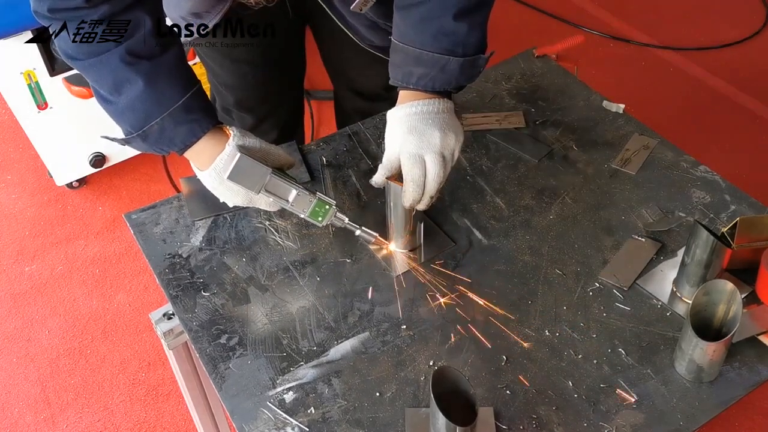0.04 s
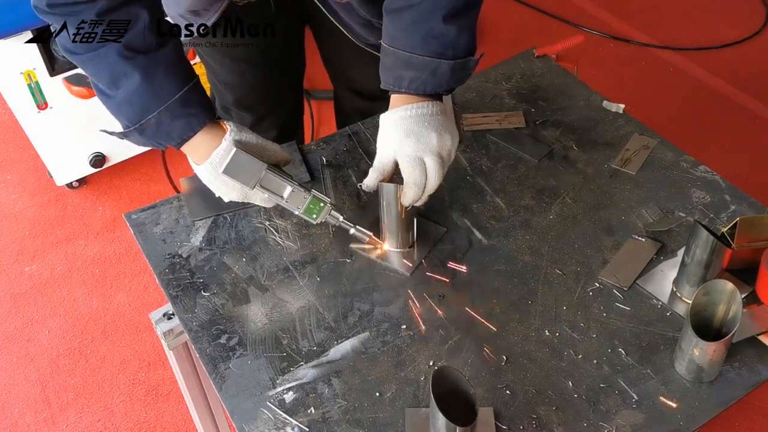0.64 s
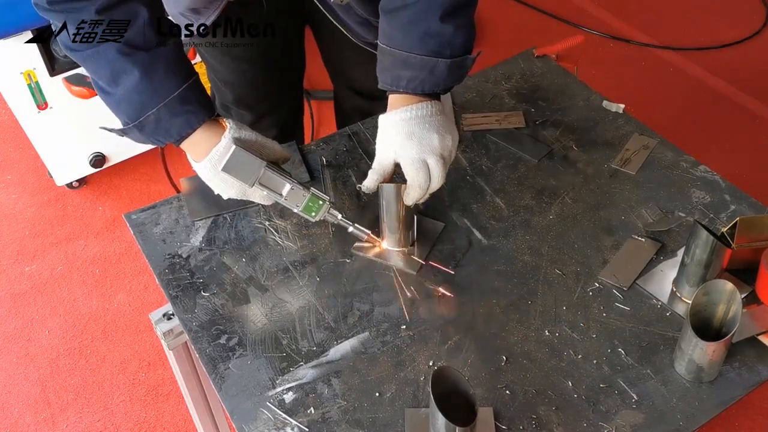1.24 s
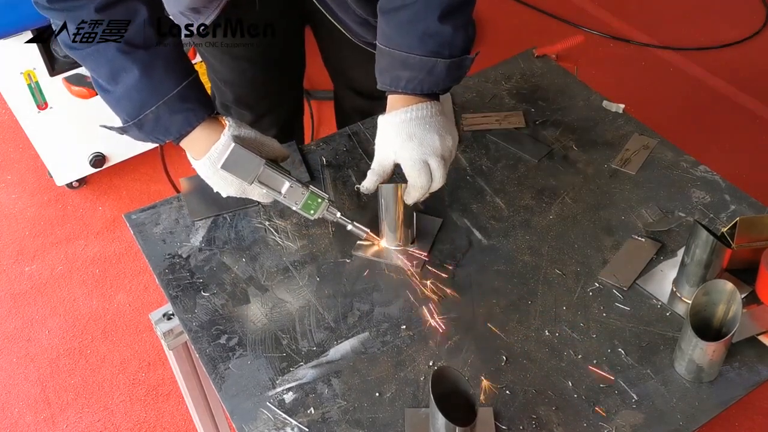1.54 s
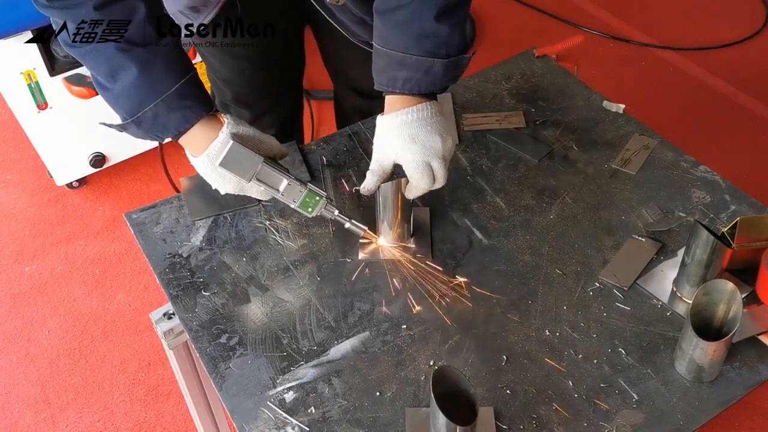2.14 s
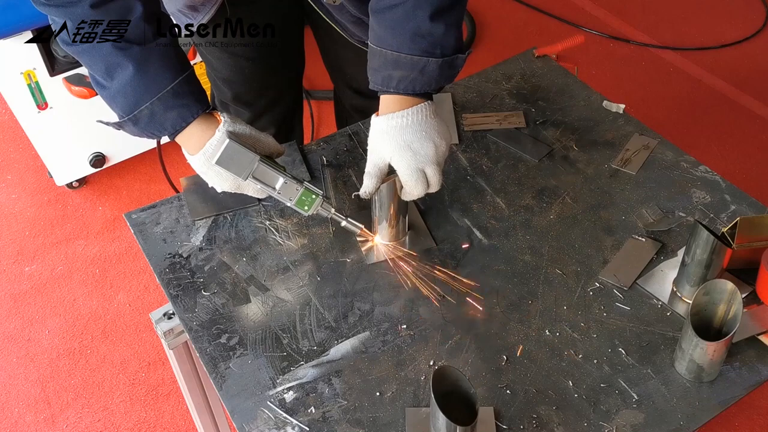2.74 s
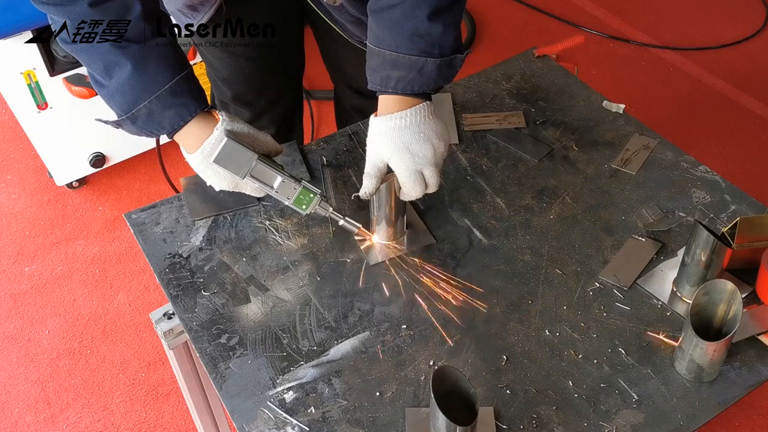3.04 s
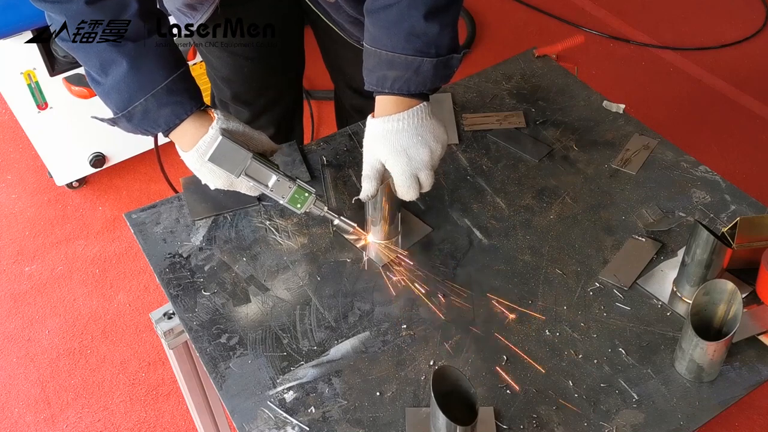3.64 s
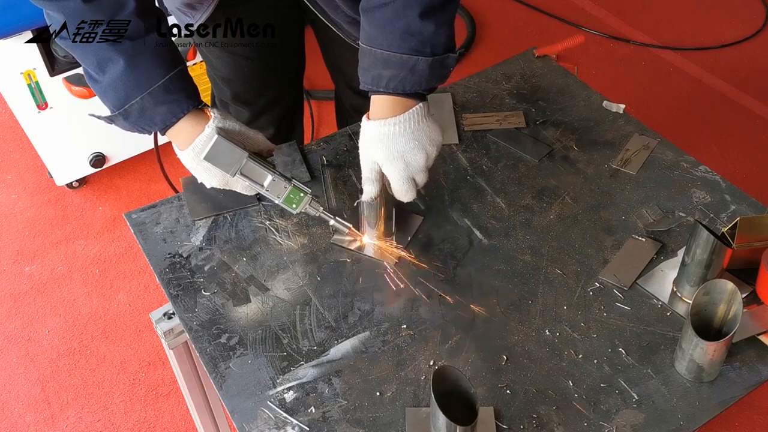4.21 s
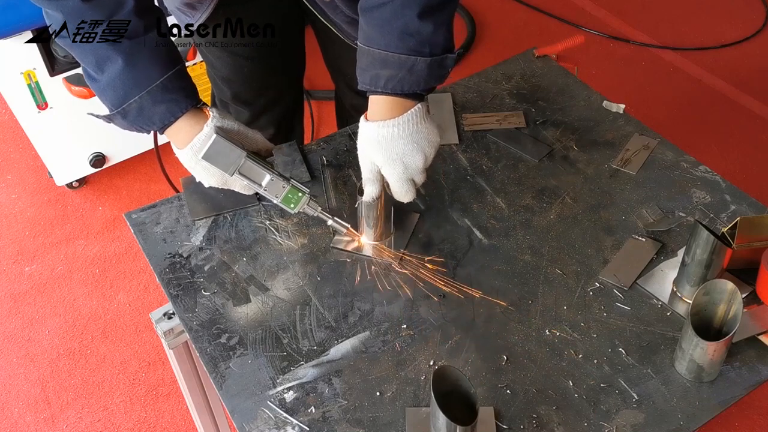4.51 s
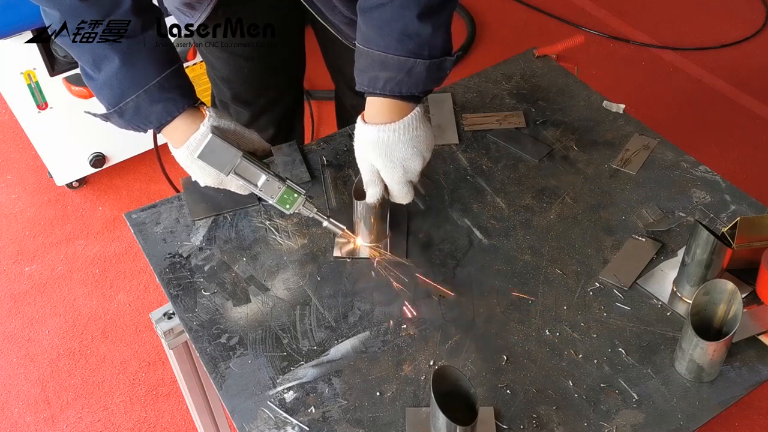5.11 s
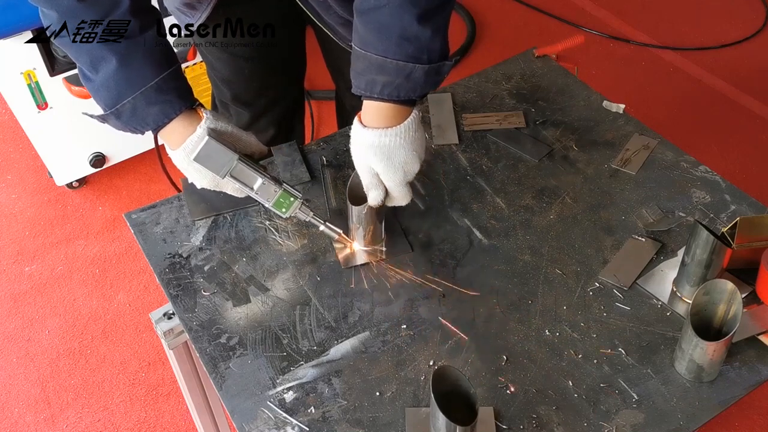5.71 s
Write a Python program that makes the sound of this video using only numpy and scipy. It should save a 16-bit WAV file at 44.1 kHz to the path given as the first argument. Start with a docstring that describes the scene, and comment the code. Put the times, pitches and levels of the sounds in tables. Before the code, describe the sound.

A handheld laser welder hisses on a steel tube from the start and continues for the whole six seconds, heard from just above a workshop bench. The sound is high and bright: rushing gas and sizzling melt with a rapid flutter, a fine crackle of sparks and small wavers in level. It dulls gradually as the torch travels.

A soft, dull bump on the bench comes at about 0.1 seconds, a faint distant metal clatter at 0.6, and weaker bumps around 2.6. At about 4.3 seconds steel strikes steel in one sharp knock, with a very brief ring, bounce and skid as the tube shifts. Afterwards the hiss is slightly softer and drifts a little to the left.

Underneath, a power unit hums quietly with a slow pulse, along with a faint room drone and a deep rumble that swells slightly near the end.

```python
"""A handheld laser welder hisses along a steel tube on a steel bench in a workshop.
Shielding gas and boiling melt excite narrow resonances of nozzle and tube; the beam swings across the
seam, modulating the hiss into a flutter, and sparks crackle. One sharp knock rings the modes of the
steel and shifts the tube, after which the hiss is softer. Behind it are dull bumps, a faint distant
clatter, the power unit's hum beating slowly against its motor, and the drone and rumble of the room."""
import sys
import numpy as np
from scipy import signal
from scipy.fft import rfft, irfft, next_fast_len
from scipy.io import wavfile
from scipy.ndimage import map_coordinates

SR = 44100
rng = np.random.default_rng(int(sys.argv[2]) if len(sys.argv) > 2 else 0)


def transcribe(signal):
    """Save signal, clipped to [-1, 1], as a 16-bit WAV file at the path in sys.argv[1]."""
    frames = np.atleast_2d(signal).T
    limited = np.clip(frames, -1, 1)
    pcm = np.round(limited * 32767).astype(np.int16)
    wavfile.write(sys.argv[1], SR, pcm)


N = 254456
TIME = np.arange(N) / SR

# path of the torch: (time [s], share of the seam [0-1])
TORCH_TRAVEL = [(0, 0.12), (3, 0.35), (4.2, 0.56), (4.7, 0.57)]
# the knock and its bounces: (time [s], level [dB], t60 [s])
KNOCK_IMPACTS = [(4.312, -16, 0.031), (4.324, -31, 0.027), (4.329, -23, 0.041), (4.3462, -22.5, 0.032),
                 (4.362, -34, 0.058)]


def weld():
    """Flow and boiling noise: melt sizzles over rushing gas, dulling along the seam and moving left."""
    # the melt flares (+) or falters (-): (time [s], length [s], level change [dB])
    flares = [(0, 0.25, -1.4), (.22, 0.24, 0.6), (.62, 0.1, -0.2), (.78, 0.079, 0.5), (1.05, 0.25, .7),
              (1.64, 0.28, 0), (2.15, 0.3, 1), (2.3, 0.15, -1.5), (2.65, 0.19, 1.4), (2.87, .08, -2.7),
              (3.26, .06, 1.3), (3.33, 0.043, -1), (5.28, .07, 1.5), (5.42, 0.14, 0.7)]
    # gain of each band: (start [dB], change over the seam [dB], change at the tube's shift [dB],
    # flare weight [ratio], waver [dB])
    gas_gain = (-42.5, -1, -1.4, 0.96, 0.88)
    sizzle_gain = (-33, 0.5, -1.4, 0.7, 0.28)
    fizz_gain = (-33, -9, 0.5, 1.2, 0.57)
    travel, = curves(TORCH_TRAVEL)
    since_knock = TIME - KNOCK_IMPACTS[0][0]
    shifted = np.clip(since_knock / .12 + .5, 0, 1)  # the tube shifts in 0.12 s, at the knock
    flare_db = humps(flares)

    def level(start_db, seam_db, shift_db, flare_weight, waver_db):
        """Gain of one band over time: factors add in decibels."""
        trend_db = start_db + seam_db * travel + shift_db * shifted
        return amp(trend_db + flare_weight * flare_db + waver_db * wobble(18))

    vapour = bench_echoes(melt())
    sizzle = level(*sizzle_gain) * jet_band(vapour, 4300, 9180)
    fizz = level(*fizz_gain) * jet_band(vapour, 9620, 17600)
    gas = level(*gas_gain) * jet_band(vapour + .91 * rng.standard_normal((2, N)), 100, 4370)
    hiss = gas + sizzle + fizz
    # the shift increases the left channel's phase lead and level; the level then keeps moving left
    stereo = (1 - shifted) * microphones(hiss, lead=1.03) + shifted * microphones(hiss, lead=1.5)
    pan_db = .1 + .7 * shifted + .7 * np.maximum(since_knock, 0)
    return stereo * amp(.5 * np.array([pan_db, -pan_db]))


def melt(swing_hz=49.33, flutter_db=1.15, dwell_db=.42, spark_db=-16, sparks_per_s=1200):
    """Amplitude modulation: vapour spurts at both turns of the beam; the pool boils and throws sparks."""
    swing = 2 * np.pi * swing_hz * TIME + .077 * wobble(2.9)
    dwell = np.cos(4 * swing) + .5 * np.cos(5 * swing) + .5 * np.cos(6 * swing)
    spurt_db = flutter_db * np.cos(2 * swing) + dwell_db * dwell
    boil_db = .3 * wobble(24.87) + .3 * wobble(160)
    sparks = (rng.random(N) < sparks_per_s / SR) * rng.uniform(-.51, 1, (2, N))
    return amp(spurt_db + boil_db) * (rng.standard_normal((2, N)) + amp(spark_db) * unit(sparks))


def jet_band(source, lo_hz, hi_hz):
    """Resonance: nozzle and tube lift narrow peaks in a band of the jet, varying as the torch travels."""
    # broad spectrum of the jet: (frequency [Hz], spectral level [dB])
    jet_spectrum = [(150, -45), (500, -23), (900, -18.5), (1300, -22), (2000, -16), (2600, -11),
                    (4100, -10.5), (4700, -6.5), (5900, -7.5), (9900, -5), (10900, 1.5), (11600, 0),
                    (12400, -7), (15000, -6), (15500, -13)]
    # nozzle and tube: (centre [Hz], width [Hz], lift at the seam's start [dB], lift at its end [dB])
    resonances = [(1651, 217, 11.5, 16.5), (3703, 108, 10.5, 11), (4550, 640, 3, -2), (5394, 276, 8.5, 7.5),
                  (6580, 326, 13, 5.5), (6960, 200, 3.5, 7.5), (7760, 160, 10.5, -6),
                  (8430, 136, 10.5, 11.5), (9050, 110, 8.5, 9.5), (9400, 130, 7.5, 9.5),
                  (10580, 320, 1.5, 5.5), (13470, 400, 3.5, 10), (14200, 450, -5, 6.5)]

    def response(hz):
        """Band-pass gain with Lorentzian peaks, for each end of the seam."""
        lift_db = sum(np.outer(ends_db, 1 / (1 + (2 * (hz - centre) / width) ** 2))
                      for centre, width, *ends_db in resonances)
        band_power = np.abs(1 / (1 + (hz / hi_hz) ** 12) - 1 / (1 + (hz / lo_hz) ** 12))
        return (amp(along(jet_spectrum, hz) + lift_db) * np.sqrt(band_power))[:, None]

    at_start, at_end = filtered(source, response)
    travel, = curves(TORCH_TRAVEL)
    return (1 - travel) * unit(at_start) + travel * unit(at_end)


def bench_echoes(x, echo_db=-17.5, count=8):
    """Comb filtering: weak reflections off the bench come and go as the hands move."""
    delays_s = rng.uniform(.002, .012, count)
    echoes = sum(np.tanh(2 * wobble(1.164)) * np.roll(x, int(s * SR), axis=-1) for s in delays_s)
    return x + amp(echo_db) * echoes


def knock(ring_db=-4.5, build_cycles=3.2):
    """Impact excites damped modes: steel strikes steel, rings briefly, bounces and skids to rest."""
    # noise of the impacts and of the skid: (frequency [Hz], spectral level [dB])
    crack_spectrum = [(100, -30), (230, 4), (340, -12), (650, -5.5), (850, 3), (1400, 2), (2100, 0.5),
                      (2600, 5), (2850, -11), (3200, 3), (3450, 4), (5400, 3), (7000, 0.5), (12000, -21),
                      (15000, -19)]
    skid_spectrum = [(300, -9), (2000, -5), (4700, 1), (6500, -4), (8000, 3), (9500, -6), (15000, -19)]
    # modes of the steel: (frequency [Hz], relative level [dB], t60 [s])
    steel_modes = [(476.5, -4, 0.1), (850, -19, 0.099), (1030, -15, 0.051), (1185, -11, 0.08),
                   (1720, -20, 0.09), (2290, -7.5, 0.091), (2510, -9, 0.065), (2577, -3.5, 0.053),
                   (3640, -3, 0.052), (5350, 5.5, 0.023)]
    # sliding friction after the blow: (time [s], level [dB])
    skid_envelope = [(4.32, -76), (4.34, -36), (4.37, -30.5), (4.385, -34), (4.405, -71)]
    impacts = sum(amp(db) * decay(s, t60, attack=.00053) for s, db, t60 in KNOCK_IMPACTS)
    crack = impacts * noise(crack_spectrum)
    start, blow_db, _ = KNOCK_IMPACTS[0]
    ring = sum(amp(blow_db + ring_db + db) * damped_mode(start, hz, t60, attack=build_cycles / hz)
               for hz, db, t60 in steel_modes)
    skid_db, = curves(skid_envelope)
    skid = amp(skid_db) * noise(skid_spectrum)
    contact = microphones(hall(crack + skid, wet_db=-10.5), lead=1.3, spread=.89)
    return contact + hall(ring[None], wet_db=-17)


def bumps(thud_db=-12):
    """Soft impacts excite low frequencies: the bench's lowest mode sounds inside a dull thud."""
    # bumps on the bench: (time [s], level [dB], frequency [Hz], t60 [s])
    blows = [(0.082, -37.5, 150, 0.23), (0.126, -43, 142, 0.52), (2.54, -49, 155, 0.28),
             (2.659, -49, 130, 0.26), (2.68, -58, 239, .25)]
    # noise around a bump: (frequency [Hz], spectral level [dB])
    thud_spectrum = [(50, -23), (110, -2), (170, -1), (230, -7), (330, -14), (800, -50)]
    ring = sum(amp(db) * damped_mode(s, hz, t60, attack=.0074) for s, db, hz, t60 in blows)
    thud_envelope = sum(amp(db + thud_db) * decay(s, t60=.76, attack=.01) for s, db, _, _ in blows)
    return ring + thud_envelope * microphones(noise(thud_spectrum))


def clatter():
    """Reverberation blurs distant impacts: metal put down further off arrives faint and dull."""
    # contacts of the metal: (time [s], level [dB], t60 [s])
    contacts = [(.592, -42, 0.14), (0.619, -31, 0.045), (0.653, -42, 0.17)]
    # their noise: (frequency [Hz], spectral level [dB])
    contact_spectrum = [(100, -15), (220, 2), (350, -2), (480, 1), (650, -4), (900, -1), (1300, -5),
                        (2100, -3), (2600, 3), (3300, -3), (8000, -14)]
    envelope = sum(amp(db) * decay(s, t60, attack=.001) for s, db, t60 in contacts)
    return microphones(hall(envelope * noise(contact_spectrum), wet_db=-3.5))


def power_unit(mains_hz=49.975, motor_hz=49.32, fan_hz=276):
    """Beating: the motor slips behind the mains, so their hums swell and fade; a fan adds a tone."""
    # hum of the mains and of the motor: (harmonic [number], level [dB])
    mains_harmonics = [(2, -58), (4, -63.5), (6, -70)]
    motor_harmonics = [(2, -64.5), (3, -64.5), (4, -63.5)]
    mains = sum(amp(db) * tone(k * mains_hz, waver_db=.8, drift_rad=.1) for k, db in mains_harmonics)
    motor = sum(amp(db) * tone(k * motor_hz, waver_db=1.5, drift_rad=.2) for k, db in motor_harmonics)
    fan = amp(-67.5) * tone(fan_hz, waver_db=3, drift_rad=.3)
    return mains + motor + fan


def tone(hz, waver_db, drift_rad, in_step_s=.49):
    """A partial of the hum, modulated in level and phase; partials add constructively at in_step_s."""
    lead_rad = np.array([[.2], [-.2]])  # the unit stands to the left
    phase = 2 * np.pi * hz * (TIME - in_step_s)
    return amp(waver_db * wobble(7.4)) * np.sin(phase + lead_rad + drift_rad * wobble(2.97))


def workshop(drone_db=-60.5, rumble_db=-65):
    """Ambient noise: a steady drone and a deep rumble that swells now and then."""
    # the room's two noises: (frequency [Hz], spectral level [dB])
    rumble_spectrum = [(15, -20), (30, -8), (48, 0.5), (65, -5), (100, -27.5)]
    drone_spectrum = [(50, -3), (90, 1.5), (150, -2), (185, 1), (270, 1), (390, -5), (470, -16), (600, -7),
                      (1200, -11.5), (3000, -50)]
    # swells of the rumble: (time [s], length [s], rise [dB])
    swells = [(1.74, .26, 8), (4.66, .13, 7), (5.09, .17, 12), (5.37, 0.2, 13), (5.57, .18, 12)]
    rumble = amp(rumble_db + humps(swells)) * microphones(noise(rumble_spectrum))
    pan_right = amp([[-1.5], [1.5]])
    return pan_right * rumble + amp(drone_db) * microphones(noise(drone_spectrum))


def hall(x, wet_db):
    """Reverberation: x gains a diffuse tail that lasts longest in the midrange."""
    # reverberation of the workshop: (frequency [Hz], t60 [s])
    decay_times = [(150, 0.19), (500, 0.3), (2000, 0.57), (6000, 0.068), (14000, 0.036)]
    hz, t, spectra = signal.stft(rng.standard_normal((2, SR // 2)), SR, nperseg=256)
    absorption = np.exp(-np.log(1000) * t / along(decay_times, hz)[:, None])
    _, tail = signal.istft(spectra * absorption, SR, nperseg=256)
    tail /= np.linalg.norm(tail[0])
    return x + amp(wet_db) * signal.fftconvolve(x[:1], tail, axes=1)[:, :N]


def microphones(pair, lead=1, spread=0):
    """Partial coherence at two ports: lead scales their phase difference, spread diffuses the treble."""
    # the ports: (frequency [Hz], left minus right [dB], left lead [rad], coherence [0-1])
    ports = [(100, 0, .1, .9), (500, .5, .1, .8), (1000, 0, 0, .75), (1700, -1, 0, .76),
             (2000, -.5, 0, .84), (3800, -.3, 0, .9), (4300, -2.5, .55, .64), (5400, -3.5, .85, .7),
             (6000, -1.5, .4, .62), (6700, -3.7, .6, .77), (7200, -6.5, 1, .5), (7850, -11, 1.5, .48),
             (8450, -1, 2.6, .76), (9400, 5.3, 2, .68), (10700, 6.3, 1.6, .76), (11600, 4.5, 1.2, .72),
             (12400, 2, 1.7, .48), (15000, 2, 1.6, .5)]

    def weights(hz):
        """Direct and diffuse gains, whose powers sum to one."""
        coherence = along(ports, hz, column=3) * (1 - spread * hz ** 2 / (hz ** 2 + 1200 ** 2))
        angle = np.arccos(np.clip(coherence, 0, 1)) / 2
        return np.array([np.cos(angle), np.sin(angle)])

    def sides(hz):
        """Each port takes half of the difference in level and phase."""
        left = amp(along(ports, hz) / 2) * np.exp(.5j * lead * along(ports, hz, column=2))
        return np.array([left, 1 / left])

    direct, diffuse = filtered(pair, weights)
    return filtered(np.array([direct + diffuse, direct - diffuse]), sides)


def damped_mode(start, hz, t60, attack):
    """Free vibration: a sinusoid that builds up and dies away."""
    return decay(start, t60, attack) * np.sin(2 * np.pi * hz * (TIME - start))


def decay(start, t60, attack):
    """Exponential rise and decay after a blow; all times in seconds."""
    age = np.maximum(TIME - start, 0)
    return np.exp(-np.log(1000) * age / t60) * (1 - np.exp(-age / attack))


def noise(spectrum):
    """Two uncorrelated noises of rms 1 with the given spectrum."""
    return unit(filtered(rng.standard_normal((2, N)), lambda hz: amp(along(spectrum, hz))))


def filtered(x, response):
    """Linear filtering: the spectrum of x times a frequency response."""
    size = next_fast_len(N + SR // 2)
    return irfft(rfft(x, size) * response(np.fft.rfftfreq(size, 1 / SR)), size)[..., :N]


def wobble(rate):
    """A smooth random curve, rate knots a second."""
    return map_coordinates(rng.standard_normal(int(N * rate / SR) + 4), [TIME * rate])


def humps(rows):
    """Sum of Gaussian swells from (time [s], length [s], level [dB]) rows."""
    return sum(db * np.exp(-(2 * (TIME - s) / length) ** 2) for s, length, db in rows)


def curves(rows):
    """Each column after the time, interpolated to one value per sample."""
    times, *columns = np.transpose(rows)
    return [np.interp(TIME, times, column) for column in columns]


def along(points, hz, column=1):
    """One column of a table, interpolated on a logarithmic frequency axis."""
    columns = np.transpose(points)
    return np.interp(np.log(hz + 1), np.log(columns[0] + 1), columns[column])


def amp(db):
    """Decibels to gain."""
    return 10 ** (np.asarray(db) / 20)


def unit(x):
    """x scaled to rms 1."""
    return x / np.sqrt(np.mean(x ** 2) + 1e-20)


def scene():
    """Superposition of all sources, heard from above the bench."""
    return weld() + power_unit() + workshop() + bumps() + knock() + clatter()


def record(dry):
    """Band limiting: an ideal low-pass filter removes the highest treble."""
    return filtered(dry, lambda hz: hz < 15750)


dry = scene()
out = record(dry)
transcribe(out)
```